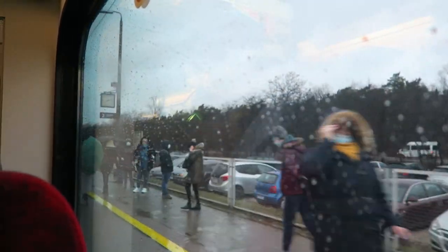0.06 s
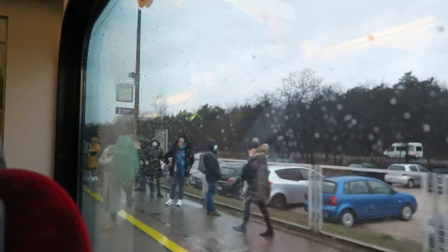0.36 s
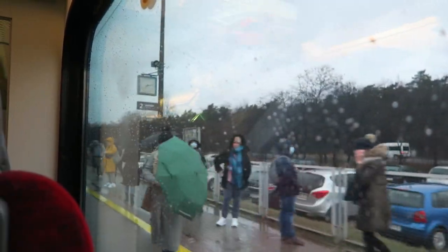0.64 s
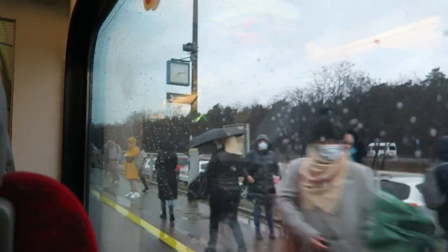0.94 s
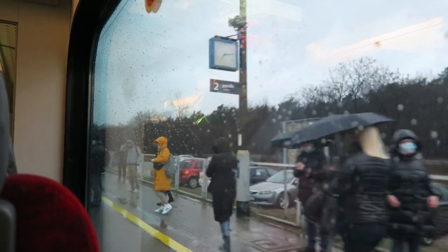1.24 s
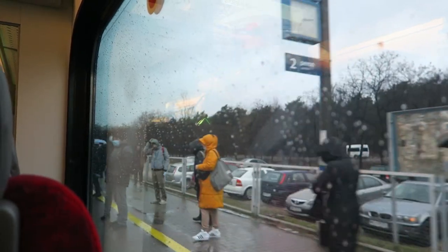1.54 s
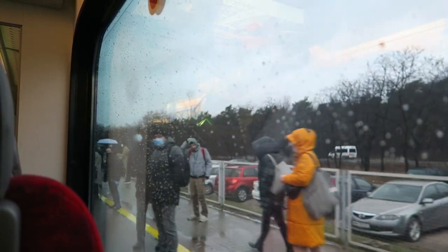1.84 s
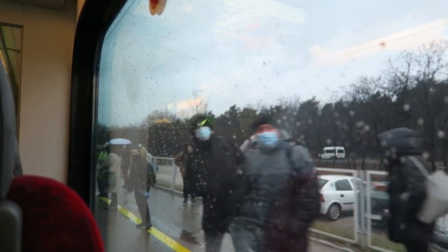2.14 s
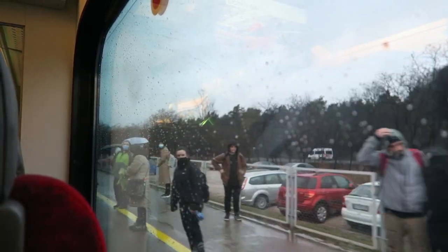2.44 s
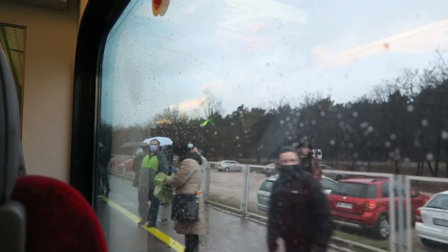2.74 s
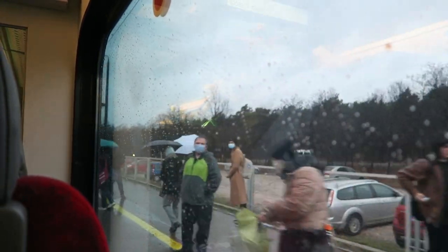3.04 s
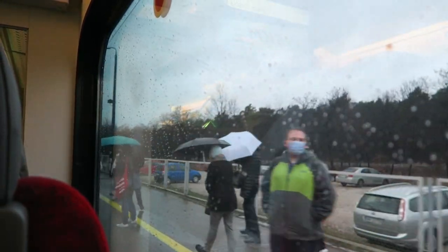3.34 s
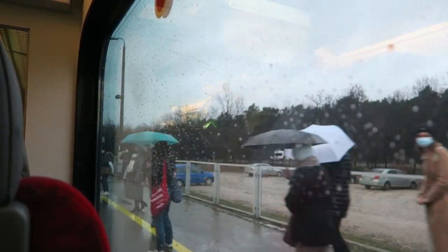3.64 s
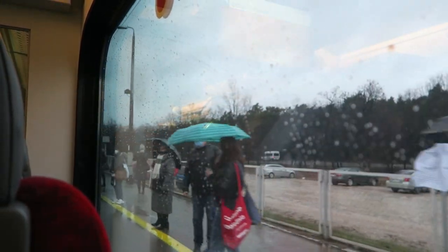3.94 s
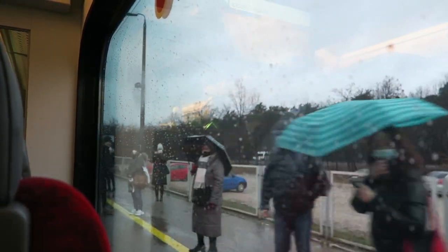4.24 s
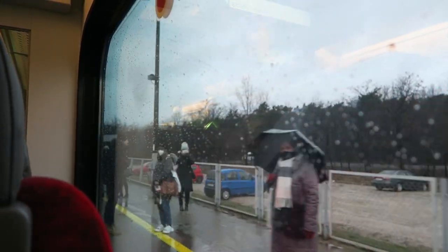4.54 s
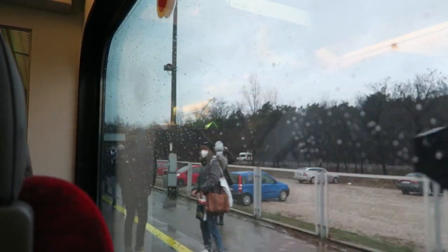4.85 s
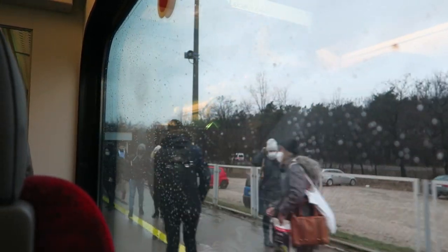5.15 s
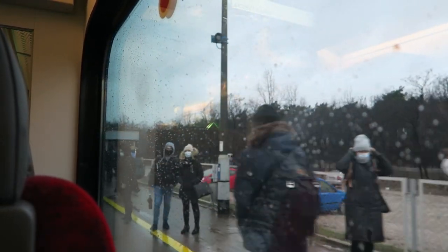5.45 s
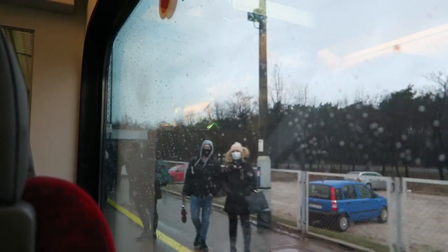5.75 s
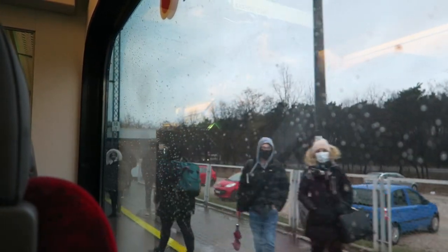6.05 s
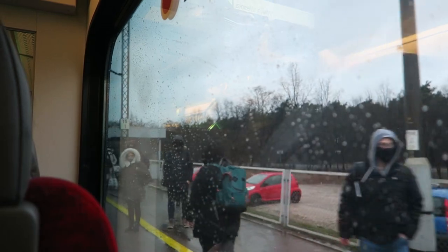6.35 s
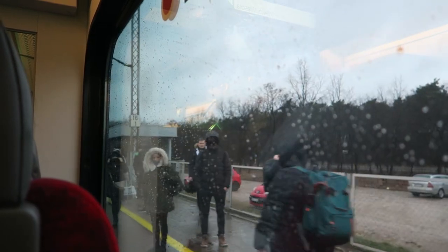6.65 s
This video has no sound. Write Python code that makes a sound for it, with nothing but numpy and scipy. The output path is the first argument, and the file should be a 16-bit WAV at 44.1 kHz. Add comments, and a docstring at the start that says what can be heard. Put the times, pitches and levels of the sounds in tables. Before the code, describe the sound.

A deep, even hum of fans and electrical equipment is heard in stereo from within a train carriage, with floor rumble and a light rush of air. Small knocks and ticks lead to one heavy, dull thump, then a short creak, two softer thumps and faint, thin squeals from the trim. Toward the end, clothing rustles softly around a brief, sharp clatter of a fitting closing, and the hum carries on.

```python
"""Electric train creeping along a platform

From inside the carriage, in stereo: fan motors hum, the converter whines, air rushes from the vents.
The floor rumbles and thumps, panels knock, and the trim ticks, creaks and squeals as it sticks and slips.
Near the end cloth rustles and a fitting clacks shut. The limiter ducks briefly after the heaviest thump."""
import sys
import numpy as np
from scipy import signal
from scipy.fft import rfft, irfft, next_fast_len
from scipy.io import wavfile
from scipy.ndimage import uniform_filter1d

SR = 44100
rng = np.random.default_rng(int(sys.argv[2]) if len(sys.argv) > 2 else 0)


def output_pcm(signal):
    """Save a mono or channel-first signal as 16-bit PCM at the path in sys.argv[1].

    Samples are clipped to [-1, 1] before scaling.
    """
    pcm = np.clip(np.atleast_2d(signal).T, -1, 1) * 32767
    wavfile.write(sys.argv[1], SR, np.round(pcm).astype(np.int16))


N = 303849
TIME = np.arange(N) / SR
FFT_SIZE = next_fast_len(N)
BIN_HZ = np.maximum(np.fft.rfftfreq(FFT_SIZE, 1 / SR), 1)
CABIN_T60_S = 0.34

# Stereo width at the microphones. Each row: frequency in Hz, side minus mid in dB.
CABIN_WIDTH = [(60, -30.5), (150, -23.5), (350, -16), (600, -13), (1400, -12.5), (2400, -12), (5000, -6.5),
               (8000, -3), (12000, 3)]
# Noise colours of floor, vents, cloth, panels and fitting. Each row: frequency in Hz, relative level in dB.
RUMBLE_SPECTRUM = [(10, -72.5), (24, -62), (36, -71.5), (50, -46.5), (63, -43), (110, -39.5), (150, -45.5),
                   (205, -48.5), (270, -57.5), (320, -50.5), (358, -54), (410, -64), (600, -83.5),
                   (3000, -160)]
VENT_SPECTRUM = [(200, -75), (470, -64), (560, -69), (660, -67.5), (860, -73.5), (1150, -72), (1780, -80),
                 (2650, -82), (3700, -92.5), (5500, -99), (7500, -98.5), (8900, -110), (12200, -113)]
CLOTH_SPECTRUM = [(800, 0), (2500, 16), (4500, 5), (7600, -3.5), (9000, -4), (12300, -5.5), (13200, -16),
                  (15500, -22.5)]
PANEL_SPECTRUM = [(200, -21.5), (480, 19), (1000, -13), (1500, -3), (2300, -6.5), (4000, -35),
                  (9000, -50.5)]
FITTING_SPECTRUM = [(400, -20), (1200, -10.5), (2400, -0.5), (3400, -7.5), (4700, -11), (7800, -15.5),
                    (8700, -22.5), (12300, -24), (13200, -34.5), (15500, -35)]
# Tones of a seven-bladed fan. Each row: multiple of the shaft rate, level in dB, waver as a share.
FAN_HARMONICS = [(1, -17.5, 0.024), (2, -38.5, 0.096), (3, -32.5, 0.32), (7, -30.5, 0.079),
                 (14, -57.5, 0.35), (16, -55, 0.74)]
# Hum of the converter and other equipment. Each row: frequency in Hz, level in dB, waver as a share.
HUM_LINES = [(175.2, -35, .3), (260.3, -46, .3), (445, -55, .3), (522, -54, .4), (891.5, -57.5, .3),
             (975.6, -53, .15), (1075.5, -63.5, .3), (1175.6, -61, .3), (1276, -62.5, .3), (1669, -62, .6),
             (1751, -69, .4), (2001, -64.5, 1.5), (3404, -76, .5)]
# Sweeps of cloth. Each row: time of the peak in seconds, level in dB, length in seconds.
CLOTH_SWEEPS = [(2.136, -49.5, 0.082), (5.94, -52, 0.26), (6.187, -49.5, 0.22), (6.644, -52, 0.21),
                (6.797, -55, .22)]
# Faint squeals. Each row: start and length in seconds, first and last pitch in Hz, level in dB,
# pitch jitter in Hz.
FRICTION_SQUEALS = [(2.55, .3, 1430, 1420, -55, 40), (3.05, .35, 1410, 1420, -54.5, 35),
                    (3.82, .45, 6040, 5850, -67.5, 22), (4.6, .1, 2680, 2720, -47, 100),
                    (5.25, .045, 2560, 2540, -48.5, 100), (5.375, .22, 2680, 2630, -51, 65),
                    (5.43, .14, 6020, 6040, -70.5, 25), (5.5, .2, 1620, 1635, -56, 40),
                    (5.65, .12, 5930, 5880, -70.5, 22), (6.3, .24, 2760, 2820, -50.5, 75),
                    (6.55, .34, 2760, 2800, -56, 90)]
# Resonances of the creak. Each row: frequency and width in Hz, level in dB, weakening in dB per second.
CREAK_RESONANCES = [(2090, 330, -29.5, 215), (3950, 800, -42, 110), (5450, 330, -49, 130)]
# Slips of the trim. Each row: start in seconds, relative level in dB, offset for its snap in dB.
TRIM_SLIPS = [(0.1695, -51.5, -5), (0.3057, -49, -13), (0.3711, -52, -12), (0.4279, -57, -16),
              (0.6579, -53, -18), (0.82, -48, -16), (1.043, -43, -12), (1.1902, -49, -12),
              (1.3588, -56, -6), (1.4072, -47.5, -7), (1.474, -47, -8), (1.5199, -52, -14),
              (1.5409, -48, -10), (1.5803, -52, -15), (1.6202, -51.5, -6), (1.7845, -44, -11),
              (1.824, -41.5, -11), (1.8642, -46, -8), (1.9046, -50, -6.5), (2.7536, -47, -18),
              (2.9188, -50, -10), (3.0205, -53, -15), (3.1617, -58, -18), (3.5129, -47, -10),
              (4.0262, -46.5, -7.5), (4.0901, -53, -11), (4.2118, -48, -10), (4.4174, -53, -18),
              (4.7406, -49, -11), (5.1771, -49, -16), (6.2856, -48, -13), (6.4712, -49, -13)]
# Upper resonances of the trim. Each row: frequency and width in Hz, relative level in dB.
TRIM_RESONANCES = [(3000, 700, -7), (5300, 500, -4), (6600, 500, -4), (7400, 700, -5), (9900, 900, -11.5),
                   (11700, 900, -9)]
# Thumps underfoot. Each row: time of the peak in seconds, peak in dB, pitch in Hz, half-length in seconds.
FLOOR_THUMPS = [(1.348, -9, 67, 0.014), (1.395, -16, 61, 0.045), (1.707, .5, 56, 0.012),
                (3.443, -11.5, 63, 0.008), (3.921, -18, 52, 0.029)]
# Knocks on the panels. Each row: time of the peak in seconds, peak in dB, pitch in Hz,
# half-length in cycles, scatter relative to the peak in dB.
PANEL_KNOCKS = [(.303, -24, 520, .8, -14), (.309, -20, 850, .5, -15), (.3255, -23.5, 720, .55, -13),
                (1.055, -30, 1100, .6, -9), (1.063, -23, 720, .55, -12), (1.0675, -20, 520, 1.0, -13.5),
                (5.153, -32, 2300, 1.0, -16), (5.9345, -26, 2400, 1.9, -15), (5.969, -28, 2300, 1.4, -15),
                (6.1296, -11.5, 1000, .42, -22), (6.1298, -23, 330, .7, -20),
                (6.1318, -19.5, 1600, .6, -16), (6.1338, -23, 2200, .9, -22), (6.137, -22.5, 1500, .8, -14)]
# Hard contacts of the fitting. Each row: start in seconds, level in dB.
FITTING_CONTACTS = [(.3075, -47), (2.655, -50), (3.785, -47), (5.152, -42), (5.262, -50), (5.858, -50),
                    (5.932, -44), (5.967, -44), (6.1125, -43.5), (6.1312, -29), (6.146, -43), (6.635, -44)]


def from_db(db):
    """Decibels to gain."""
    return 10 ** (np.asarray(db) / 20)


def unit_rms(x):
    """Scale to unit power."""
    return x / np.sqrt(np.mean(x ** 2) + 1e-20)


def colour(points):
    """Gain at every frequency, drawn through a few points of a spectrum."""
    hz, db = np.transpose(points)
    return from_db(np.interp(np.log(BIN_HZ), np.log(hz), db))


def resonances(modes):
    """Gain at every frequency of a few steep-sided resonances."""
    return sum(from_db(db) / (1 + ((BIN_HZ - hz) / width) ** 2) ** 2 for hz, width, db in modes)


def cabin_noise(gain):
    """Coloured noise as it reaches the microphones: nearly mono in the bass, wide in the treble."""
    mid, side = rfft(rng.standard_normal((2, FFT_SIZE))) * gain * np.sqrt(SR / 2)
    side = side * colour(CABIN_WIDTH)
    return irfft([mid + side, mid - side], FFT_SIZE)[:, :N]


def drift(rate_hz):
    """Smooth random motion of unit spread, mostly slower than the given rate."""
    spectrum = rfft(rng.standard_normal(FFT_SIZE)) / (1 + (BIN_HZ / rate_hz) ** 2) ** 2
    return unit_rms(irfft(spectrum, FFT_SIZE)[:N])


def tone(phase, level_db, waver, rate_hz):
    """A steady tone whose strength and phase waver."""
    line = (1 + waver * drift(rate_hz)) * np.sin(phase) + waver * drift(rate_hz) * np.cos(phase)
    return from_db(level_db) * unit_rms(line)


def bursts(blows, rise_s, t60_s, tail_db):
    """Envelope of blows: a quick rise, a short ring and the cabin's weaker tail."""
    power = np.zeros(N)
    for start, db in blows:
        at = int(start * SR)
        age = TIME[:min(SR // 2, N - at)]
        attack = 1 - np.exp(-age / rise_s)
        decay = from_db(-60 * age / t60_s) + from_db(tail_db - 60 * age / CABIN_T60_S)
        power[at:at + len(age)] += (from_db(db) * attack * decay) ** 2
    return np.sqrt(power)


def pulse(peak_s, db, hz, half_length_s):
    """A push of only a few cycles under a bell-shaped envelope."""
    age = TIME - peak_s
    return -from_db(db) * np.cos(2 * np.pi * hz * age) * np.exp(-(age / half_length_s) ** 2)


def panned(x, right_db):
    """Place a sound between the microphones by the level of right over left."""
    return x * from_db(np.array([[-right_db], [right_db]]) / 2)


def floor_rumble():
    """Running noise comes up through the floor with a slight, slow sway."""
    return cabin_noise(colour(RUMBLE_SPECTRUM)) * from_db(-1.27 + 0.87 * drift(3.2))


def standing_waves(depth_db=1.1, width_hz=70):
    """Gain at every frequency of the small peaks and dips between the walls, shallower in the bass."""
    bins = int(width_hz * N / SR)
    uneven = rng.standard_normal(len(BIN_HZ))
    ripple = uniform_filter1d(uniform_filter1d(uneven, bins), bins)
    return from_db(depth_db * unit_rms(ripple) * np.minimum(BIN_HZ / 1500, 1))


def vent_air(top_hz=12500):
    """Turbulent air flutters out of the vents, coloured by the cabin's standing waves."""
    lowpass = 1 / np.sqrt(1 + (BIN_HZ / top_hz) ** 60)
    air = cabin_noise(colour(VENT_SPECTRUM) * lowpass * standing_waves())
    flutter = from_db(-0.38 + drift(36))
    return panned(air * flutter, right_db=0.45)


def fan_motor(shaft_hz=48.67):
    """Shaft unbalance gives the deep hum; the blades give higher, fluttering tones, a little to the left."""
    speed_hz = shaft_hz * (1 + 0.00042 * drift(1))
    shaft = 2 * np.pi * np.cumsum(speed_hz) / SR
    hum = sum(tone(k * shaft, db, waver, rate_hz=1.7) for k, db, waver in FAN_HARMONICS[:3])
    blades = sum(tone(k * shaft, db, waver, rate_hz=9) for k, db, waver in FAN_HARMONICS[3:])
    return hum + panned(blades, right_db=-1.55)


def converter(switching_hz=4200.2):
    """Magnetic hum and the pure switching whine, near the centre."""
    hum = sum(tone(2 * np.pi * hz * TIME, db, waver, rate_hz=17) for hz, db, waver in HUM_LINES)
    whine = tone(2 * np.pi * switching_hz * TIME, level_db=-54, waver=0.065, rate_hz=2.8)
    return hum + panned(whine, right_db=-0.1)


def cloth_rustle(swell_share=0.57, edge_db=-12):
    """Cloth fibres slide in small clumps; each sweep swells to a peak and dies away."""
    power = np.zeros(N)
    for peak_s, db, length in CLOTH_SWEEPS:
        part = (TIME - peak_s) / length
        from_peak = np.maximum(-part / swell_share, part / (1 - swell_share))   # 1 at either end
        power += from_db(db + edge_db * from_peak) ** 2
    clumps = from_db(2 * drift(150))
    return unit_rms(cabin_noise(colour(CLOTH_SPECTRUM))) * np.sqrt(power) * clumps


def squeals(flutter_db=4):
    """Thin friction tones swell, stutter and fade as they glide; pitch jitter makes the lower ones rasp."""
    out = np.zeros(N)
    jitter = drift(260)
    grip = unit_rms(from_db(flutter_db * drift(60)))
    for start, length, first_hz, last_hz, db, jitter_hz in FRICTION_SQUEALS:
        on = (TIME > start) & (TIME < start + length)
        part = (TIME[on] - start) / length
        hz = first_hz + (last_hz - first_hz) * part + jitter_hz * jitter[on]
        swell = np.sqrt(2 * np.sin(np.pi * part))
        out[on] += from_db(db) * swell * np.sin(2 * np.pi * np.cumsum(hz) / SR)
    return out * grip


def creak(start_s=2.309, attack_s=0.018, hold_s=0.052, t60_s=0.2, slips_per_s=150):
    """A short rub grips, holds and lets go; stick and slip drives three resonances, the lowest fading first."""
    age = np.maximum(TIME - start_s, 0)
    grip = np.minimum(age / attack_s, 1)
    release = from_db(-60 * np.maximum(age - attack_s - hold_s, 0) / t60_s)
    slips = np.cumsum(slips_per_s * np.exp(0.25 * drift(100))) / SR
    rasp = unit_rms(1 + 0.6 * np.cos(2 * np.pi * slips))
    rub = np.zeros((2, N))
    for hz, width, db, sag_db_per_s in CREAK_RESONANCES:
        band = unit_rms(cabin_noise(resonances([(hz, width, 0)])))
        rub += band * from_db(db - sag_db_per_s * age)
    return rub * grip * rasp * release


def trim_ticks(faint_per_s=2, ring_hz=4890, rise_s=0.001, t60_s=0.036):
    """Plastic trim slips in tiny steps, each setting off a rough ring and a bright snap."""
    draws = rng.random((int(faint_per_s * N / SR), 2))
    faint = [(when * TIME[-1], -61 + 5 * force, -14.5) for when, force in draws]
    slips = list(TRIM_SLIPS) + faint
    rings = [(start, db) for start, db, _ in slips]
    snaps = [(start, db + snap_db) for start, db, snap_db in slips]
    rough_hz = ring_hz + 250 * drift(800)
    ring = np.sin(2 * np.pi * np.cumsum(rough_hz) / SR) * bursts(rings, rise_s, t60_s, tail_db=-36)
    snap = unit_rms(cabin_noise(resonances(TRIM_RESONANCES))) * bursts(snaps, rise_s, t60_s, tail_db=-34)
    return from_db(2) * ring + from_db(8) * snap


def floor_thumps():
    """Heavy, low pushes come through the floor, the same in both microphones."""
    return sum(pulse(*thump) for thump in FLOOR_THUMPS)


def panel_knocks():
    """Each knock reaches the microphones as one pulse, followed by its scatter off seats and walls."""
    direct = sum(pulse(peak_s, db, hz, cycles / hz) for peak_s, db, hz, cycles, _ in PANEL_KNOCKS)
    echoes = [(peak_s, db + scatter_db) for peak_s, db, _, _, scatter_db in PANEL_KNOCKS]
    scatter = unit_rms(cabin_noise(colour(PANEL_SPECTRUM)))
    return direct + scatter * bursts(echoes, rise_s=0.002, t60_s=0.06, tail_db=-17.5)


def fitting_clatter():
    """The fitting is touched a few times and snaps home, each hard contact a bright burst."""
    envelope = bursts(FITTING_CONTACTS, rise_s=0.0003, t60_s=0.065, tail_db=-23.5)
    return unit_rms(cabin_noise(colour(FITTING_SPECTRUM))) * envelope


def scene():
    """A bed of steady machinery with the knocks and small sounds of the carriage on top."""
    bed = fan_motor() + converter() + floor_rumble() + vent_air()
    impacts = floor_thumps() + panel_knocks() + fitting_clatter()
    friction = trim_ticks() + creak() + squeals() + cloth_rustle()
    return bed + impacts + friction


def record(dry):
    """The recorder's limiter catches the heaviest peaks and lets go quickly, then slowly; the top is cut."""
    ceiling_db, quick_s, slow_s, cutoff_hz = -5, 0.085, 0.3, 16500
    peak_db = 20 * np.log10(np.abs(dry).max(axis=0) + 1e-9)
    over_db = np.maximum(peak_db - ceiling_db, 0)
    quick, slow = (np.maximum.accumulate(over_db * np.exp(TIME / release)) * np.exp(-TIME / release)
                   for release in (quick_s, slow_s))
    held_db = 0.6 * quick + 0.4 * slow
    duck_db = uniform_filter1d(uniform_filter1d(held_db, size=400), size=400, origin=-150)   # looks ahead
    lowpass = signal.cheby2(12, 70, cutoff_hz, fs=SR, output="sos")
    return signal.sosfilt(lowpass, dry * from_db(-duck_db))


dry = scene()
out = record(dry)
output_pcm(out)
```